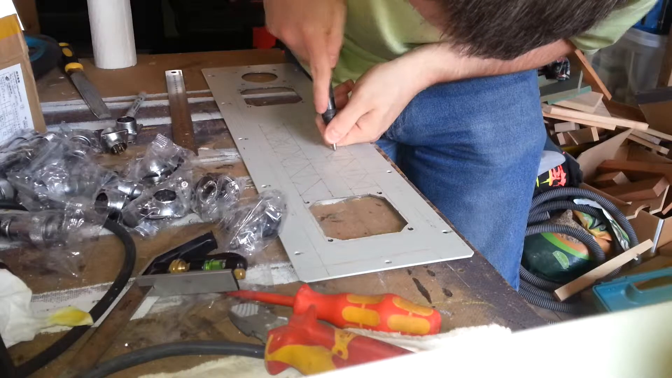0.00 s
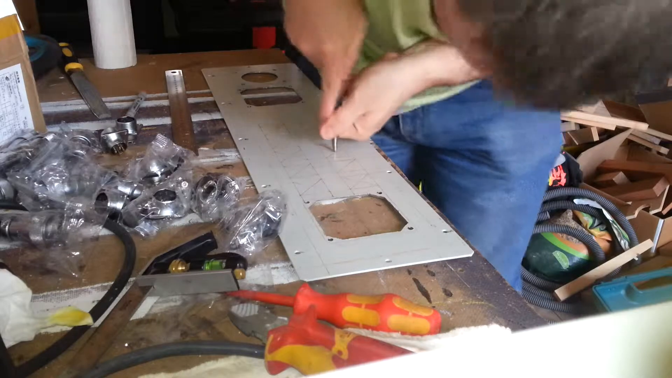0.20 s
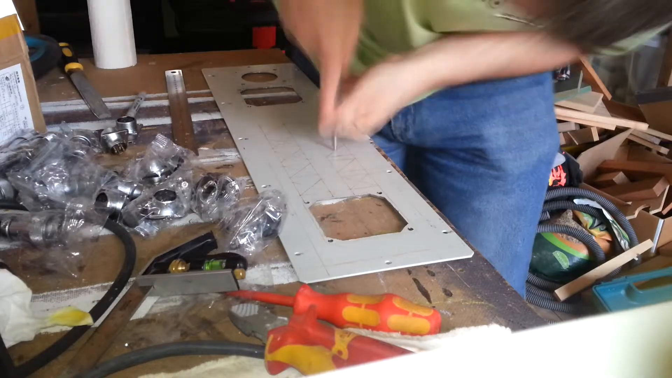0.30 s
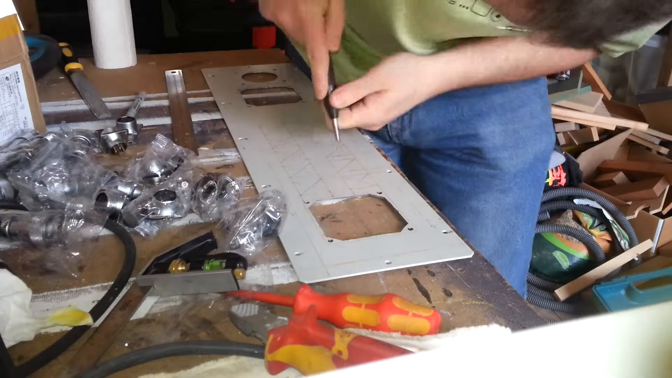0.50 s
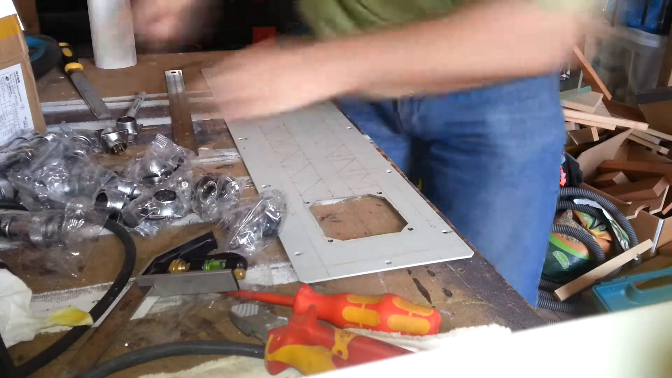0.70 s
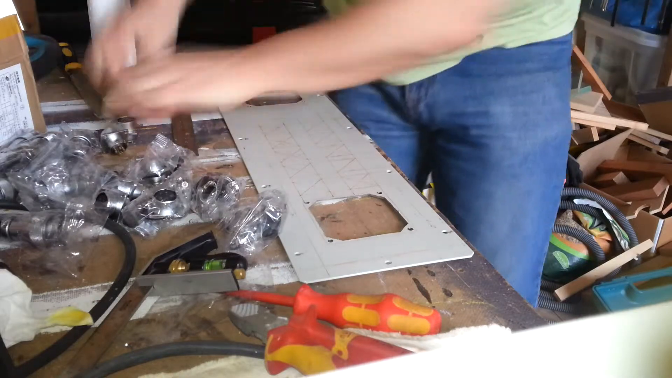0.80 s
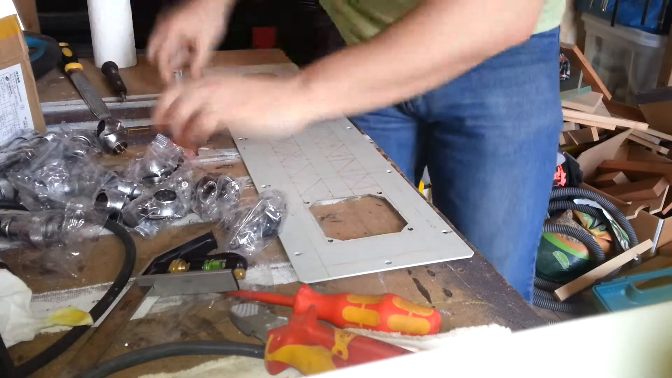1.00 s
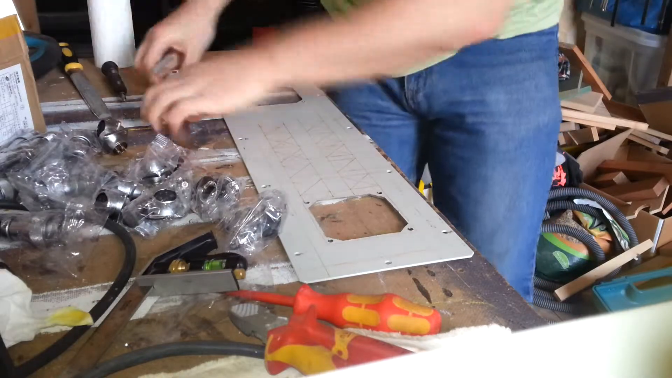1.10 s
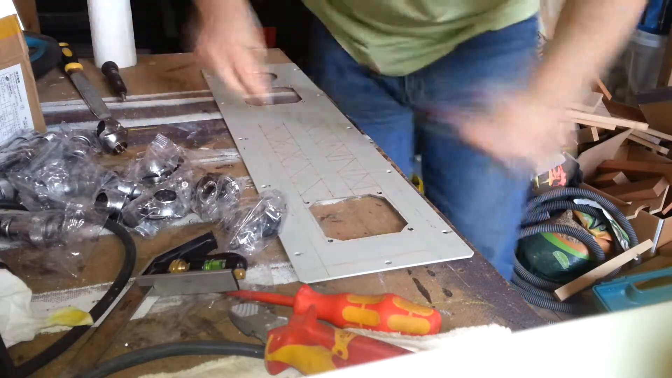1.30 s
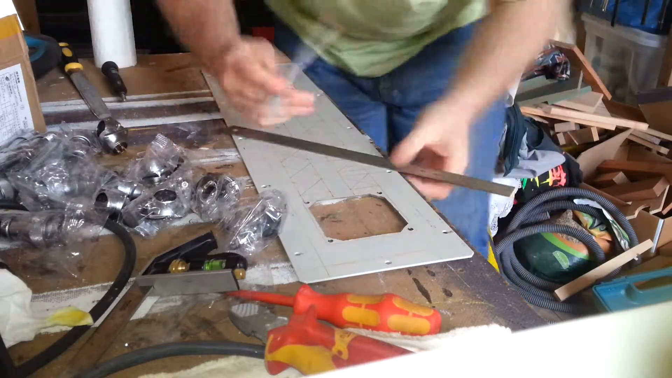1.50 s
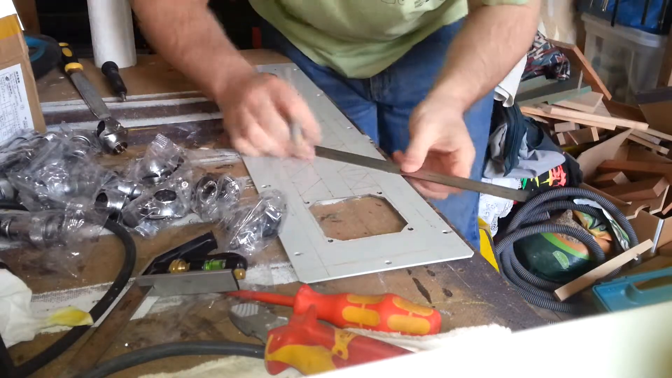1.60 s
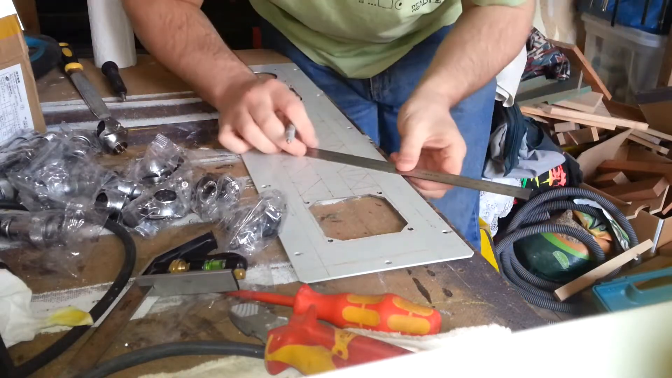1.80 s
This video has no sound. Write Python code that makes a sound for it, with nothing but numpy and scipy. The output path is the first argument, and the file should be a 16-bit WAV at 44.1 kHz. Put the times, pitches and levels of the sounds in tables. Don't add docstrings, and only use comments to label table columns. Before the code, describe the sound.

A centre punch presses on sheet metal with low ticks near 0.2 s, then fires at 0.25 s: a loud, sharp metallic crack, briefly ringing, with a weak bounce at 0.33. The punch clacks onto the bench at 0.78 and settles with a tiny tinkle. A steel rule scrapes free at 1.03, bumps at 1.2, slaps the panel at 1.4, then rubs faintly. Dry, close, quiet workshop.

```python
import sys
import numpy as np
from scipy import signal
from scipy.fft import rfft, irfft
from scipy.io import wavfile

SR = 44100
rng = np.random.default_rng(int(sys.argv[2]) if len(sys.argv) > 2 else 0)


def nominal_scale(level):
    x = np.asarray(level, float) / 20
    return 10 ** x


def dump(signal):
    limited = np.clip(np.atleast_2d(signal).T, -1, 1)
    pcm = np.round(limited * 32767).astype(np.int16)
    wavfile.write(sys.argv[1], SR, pcm)


N = 83790
TIME_S = np.arange(N) / SR
HZ = np.arange(N // 2 + 1) * SR / N + 1e-3



def curve(table, column=1):
    table = np.array(table, float)
    return np.interp(np.log(HZ), np.log(table[:, 0]), table[:, column])


def swell(rows, slower, crack_db, touch_s):
    crack_s = 0.00064
    power = 0
    for start_s, rise_s, db, step_db, t60_s in rows:
        age = TIME_S - start_s
        rising_db = step_db * (1 - age.clip(0) / rise_s)
        falling_db = -60 * (age - rise_s) / (t60_s * slower)
        shape_db = np.where(age < rise_s, rising_db, falling_db)
        touch_crack = (age >= 0) * np.exp(-abs(age) / crack_s)
        crest_crack = np.exp(-abs(age - rise_s) / crack_s)
        onset = np.exp(age.clip(None, 0) / touch_s)
        cracks = 1 + nominal_scale(2 * crack_db) * (touch_crack + crest_crack)
        power = power + onset * nominal_scale(2 * (db + shape_db)) * cracks
    return np.sqrt(power)


def struck(rows, tone, ring, ring_db, bass_slower, grit_db, crack_db, touch_s=.0001):
    narrowest_hz, split_hz = 80, 2100
    hits = rng.standard_normal((3, N)) * nominal_scale(grit_db * rng.exponential(size=N).clip(0, 4))
    hits /= hits.std()
    body = nominal_scale(curve(tone))
    for hz, width_hz, db in ring:
        body = body + nominal_scale(db + ring_db) / (1 + 2j * (HZ - hz) / max(width_hz, narrowest_hz))
    body = body / np.sqrt(np.mean(abs(body) ** 2))
    bass = rfft(hits * swell(rows, bass_slower, crack_db - 9.0, touch_s))
    treble = rfft(hits * swell(rows, 1, crack_db, touch_s))
    low = 1 / (1 + (HZ / split_hz) ** 2)
    return body * (low * bass + (1 - low) * treble)


SNAP = [
    (.2548, 0.017, -10.5, -3.5, 0.092),
]
SNAP_TONE = [(18, -52.5), (30, -29.5), (787, -6), (1440, -5), (3400, -5.5), (5450, -6), (12300, -11.5),
             (14300, -23.5), (15500, -49)]
SNAP_RING = [(370, 40, -14.5), (773, 50, -13.5), (1040, 50, -18), (2550, 20, -9), (3333, 41, -2),
             (3640, 200, -3), (3900, 38, -3.5), (4160, 183, -4), (4660, 86, -8.5), (7700, 35, -13.5),
             (10600, 400, -22.5), (11840, 79.3, -19)]


def snap():
    return struck(SNAP, SNAP_TONE, SNAP_RING, ring_db=7.0, bass_slower=1.9, grit_db=3.5,
                  crack_db=-0.5, touch_s=0.00086)


REBOUND = [
    (.330, 0.019, -29, -6.5, 0.062),
]


def rebound():
    return struck(REBOUND, SNAP_TONE, SNAP_RING, ring_db=3.5, bass_slower=1.74, grit_db=-0.5, crack_db=6.5)


PRESS = [
    (.187, 0.017, -26, -6, 0.23),
    (.219, 0.022, -23.5, 2, 0.22),
]
PRESS_TONE = [(24, -61), (40, -39), (136, 2.5), (621, -12), (1310, -12.5), (2270, -18), (6010, -20.5),
              (15500, -54)]
PRESS_RING = [(346, 80, -3.5), (1164, 520, -14.5), (3550, 330, -18.5)]


def press():
    return struck(PRESS, PRESS_TONE, PRESS_RING, ring_db=3.5, bass_slower=1.2, grit_db=5.0, crack_db=9)


SLAP = [
    (1.393, 0.022, -23, -5.5, 0.073),
]
SLAP_TONE = [(59, -53.5), (100, -16.5), (1210, -5.5), (2690, -3.5), (3540, -2), (12600, -9.5), (14500, -12),
             (15500, -40)]
SLAP_RING = [(1210, 93, -11), (3180, 138, -13), (3550, 64, 1.5), (4220, 77, -1), (5530, 120, -12),
             (6710, 150, -4), (12100, 130, -18)]


def slap():
    return struck(SLAP, SLAP_TONE, SLAP_RING, ring_db=3.5, bass_slower=2.04, grit_db=1.5, crack_db=5.5)


DROP = [
    (.751, 0.0273, -29.5, -26, 0.041),
    (.7815, 0.01, -21, -2, 0.091),
]
DROP_TONE = [(24, -50), (40, -12), (461, -2), (2270, -11), (2840, -17.5), (3930, -10), (11800, -30.5),
             (15500, -47)]
DROP_RING = [(478, 50, -22.5), (1240, 52, -14), (1820, 55, -18), (4010, 200, -5), (3760, 44, -10.5),
             (5300, 130, -16)]


def drop():
    return struck(DROP, DROP_TONE, DROP_RING, ring_db=-2.5, bass_slower=1.44, grit_db=2.5, crack_db=11.0)


LIFT = [
    (1.0215, 0.018, -28, -15.5, .12),
    (1.06, 0.014, -43.5, -21.5, 0.16),
]
LIFT_TONE = [(59, -63), (100, -35), (362, -5.5), (497, -9), (1620, 0.5), (7410, -21.5), (10600, -42),
             (15500, -46.5)]
LIFT_RING = [(1430, 390, -11), (2910, 82, -23), (3500, 430, -7.5), (10350, 690, -14), (13500, 200, -24)]


def lift():
    return struck(LIFT, LIFT_TONE, LIFT_RING, ring_db=-1.5, bass_slower=1.28, grit_db=2.0, crack_db=5)


THUD = [
    (.025, 0.016, -51, -14, 0.12),
    (.176, 0.0099, -45.5, -4, 0.05),
    (.885, 0.0023, -41, 2, 0.108),
    (1.176, 0.0265, -26, -9.5, 0.09),
    (1.360, 0.013, -36, -9, 0.21),
]
THUD_TONE = [(50, -57.5), (180, -17), (650, 0), (2000, -12), (4500, -21), (6000, -40.5), (15000, -42)]
THUD_RING = [(304.2, 50, -4.5), (479, 50, -17.5), (678, 94, -1)]


def thud():
    return struck(THUD, THUD_TONE, THUD_RING, ring_db=-7.5, bass_slower=0.93, grit_db=3.5,
                  crack_db=-8, touch_s=0.0024)


KNOCK = [
    (.692, 0.0064, -55.5, -2, 0.029),
    (.846, 0.014, -40, -5.5, 0.19),
    (1.108, 0.043, -42, 1.5, 0.6),
    (1.236, 0.027, -36.5, -5, 0.093),
    (1.302, 0.017, -39.5, -8, 0.11),
    (1.445, 0.024, -47.5, -0.5, 0.058),
]
KNOCK_TONE = [(80, -33.5), (450, 1), (1100, -7), (4500, -16.5), (6000, -27), (14500, -33)]
KNOCK_RING = [(557, 31, -9), (1060, 220, -2.5), (1480, 130, -4)]


def knock():
    return struck(KNOCK, KNOCK_TONE, KNOCK_RING, ring_db=-4.5, bass_slower=0.89, grit_db=7.0,
                  crack_db=-20, touch_s=0.0045)


TINKLE = [
    (.846, 0.0031, -39.5, -7, 0.13),
]
TINKLE_TONE = [(1000, 14.5), (4000, 5), (15000, -13.5)]
TINKLE_RING = [(9000, 172, 1), (14000, 730, -4)]


def tinkle():
    return struck(TINKLE, TINKLE_TONE, TINKLE_RING, ring_db=8.5, bass_slower=2.0, grit_db=3.0, crack_db=6.5)


SCUFF = [
    (.945, 0.011, -59.5, 1, 0.035),
    (1.585, 0.0303, -53, -2.5, 0.16),
    (1.66, 0.016, -59, -4, 0.023),
    (1.718, 0.011, -56, -0.5, 0.044),
    (1.788, 0.0117, -53.5, -2.5, 0.064),
    (1.845, 0.0069, -59, -6.5, 0.039),
]
SCUFF_TONE = [(1000, 9.5), (2200, 1.5), (3600, -6), (6000, -12)]
SCUFF_RING = [(3430, 91, 6.3), (3900, 120, 1.8)]


def scuff():
    return struck(SCUFF, SCUFF_TONE, SCUFF_RING, ring_db=3.5, bass_slower=4.5, grit_db=2.0,
                  crack_db=1, touch_s=0.0069)


# t/s, f/Hz, level/dB, T60/s
TAPS = [(.197, 350, -17.5, .08), (.2435, 3000, -26, .02), (.781, 4100, -20, 0.036),
        (.7815, 6800, -26, .008), (0.19, 1000, -29, 0.01), (.2205, 4200, -28, 0.0099),
        (.2205, 1310, -20, .06), (.231, 370, -19.5, 0.049), (.2655, 3800, -19, .02),
        (.2695, 3300, -12, 0.011), (0.2729, 680, -18, 0.03), (.277, 3400, -19, 0.025),
        (.2545, 4000, -16, 0.037), (.2365, 5200, -31, 0.0079), (.287, 3200, -17, 0.027),
        (.3465, 4044, -21.5, 0.007), (.784, 1210, -19.5, .012), (.784, 2270, -23, 0.0078),
        (.7785, 253, -29, 0.026), (.784, 480, -18.5, 0.025), (0.79, 453, -15.5, 0.021),
        (0.78, 1800, -25, 0.0034), (0.8, 610, -24, 0.024), (0.84, 1180, -36, .02), (.862, 1220, -39, .02),
        (0.87, 533, -36, .03), (.889, 434, -26.5, 0.021), (.9, 530, -32.5, 0.018), (.858, 830, -38, 0.015),
        (1.036, 1490, -20.5, 0.0079), (1.038, 4500, -28, 0.0066), (1.031, 3700, -37, 0.022),
        (1.042, 1300, -30.5, 0.024), (1.194, 1900, -26, 0.018), (1.202, 1670, -23, 0.014),
        (1.1875, 1120, -29, 0.013), (1.17, 1120, -29, 0.014), (1.183, 640, -21, 0.011),
        (1.196, 540, -20.5, 0.0074), (1.186, 990, -24, 0.0084), (1.3989, 3720, -24.5, 0.024),
        (1.2555, 1010, -32, 0.028), (1.404, 3440, -27, 0.068), (1.4099, 5400, -16, 0.0064),
        (1.4145, 3600, -26, 0.02), (1.037, 10500, -45, 0.078), (1.396, 1177, -33, 0.15),
        (1.414, 3880, -28, 0.064)]


def taps():
    out, bass_cut_hz = 0, 250
    for start_s, hz, db, t60_s in TAPS:
        age = (TIME_S - start_s).clip(0)
        out = out + nominal_scale(db - 60 * age / t60_s) * np.sin(2 * np.pi * hz * age)
    return rfft(out) / (1 - 1j * bass_cut_hz / HZ)


# t/s, held/s, f/Hz, level/dB, T60/s
SING = [
    (.030, .024, 310, -52, .3),
    (.2337, .001, 520, -13, .012),
    (.255, .008, 4220, -19, .08),
    (.277, .047, 915, -22, .24),
    (.36, .09, 4000, -68, .6),
    (.582, .02, 950, -46, .035),
    (.894, .008, 480, -41, .05),
    (1.2015, .002, 620, -19, .015),
    (1.398, .034, 3630, -31, .14),
    (1.458, .025, 900, -48, .2),
]


def singing():
    out, rise_s, damping_s = 0, .0005, .005
    for start_s, held_s, hz, db, t60_s in SING:
        age = TIME_S - start_s
        gate = np.clip(age / rise_s, 0, 1) * np.clip((held_s - age) / damping_s + 1, 0, 1)
        out = out + gate * nominal_scale(db - 60 * age.clip(0) / t60_s) * np.sin(2 * np.pi * hz * age)
    return rfft(out)


# t/s, held/s, start f/Hz, end f/Hz, level/dB
CLIMB = [
    (.248, .034, 710, 830, -22),
    (.266, .02, 570, 670, -27),
    (.254, .016, 1070, 1040, -34),
    (.345, .022, 350, 490, -38),
    (.340, .032, 1190, 1200, -40),
    (.252, .04, 48, 36, -33),
]


def bending():
    out = 0
    for start_s, held_s, hz, end_hz, db in CLIMB:
        age = (TIME_S - start_s).clip(0, held_s)
        cycles = age * (hz + (end_hz - hz) * age / held_s / 2)
        out = out + nominal_scale(db) * np.sin(np.pi * age / held_s) * np.sin(2 * np.pi * cycles)
    return rfft(out)


def room(near):
    level_db, t60_s = -35.5, 0.13
    tail = rng.standard_normal((3, N)) * nominal_scale(-60 * TIME_S / t60_s)
    return near[0] * rfft(tail / np.sqrt(np.sum(tail[0] ** 2))) * nominal_scale(level_db)


# f/Hz, density/dB per Hz
AIR = [(18, -40.5), (30, -23.5), (160, 1), (410, -7.5), (1510, -13.5), (1820, -20), (12600, -27),
       (14300, -23), (15500, -58.5)]


def air():
    level_db, late_db, late_s = -59.5, 0.5, 0.89
    out = 0
    noise = rfft(rng.standard_normal((3, N))) * nominal_scale(curve(AIR))
    for octave in range(5, 15):
        band = irfft(noise * np.clip(1 - abs(np.log2(HZ) - octave), 0, 1), N)
        flicker_db = np.interp(TIME_S, np.arange(40) / 20, rng.standard_normal(40))
        out = out + band * nominal_scale(flicker_db)
    return rfft(out / out.std() * nominal_scale(level_db + late_db * (TIME_S > late_s)))


# f/Hz, shared part/0-1
PORTS = [(60, .92), (330, .88), (640, .3), (1400, .05), (3100, .25), (8000, .03)]
# f/Hz, left re right/dB
LEFT_DB = [(250, -0.5), (600, 1), (3000, 0), (10000, 3.5)]


def ports(spectra):
    share = np.clip(curve(PORTS), 0, 1)
    both = np.sqrt(share) * spectra[0] + np.sqrt(1 - share) * spectra[1:]
    return irfft(both * nominal_scale(np.array([[.5], [-.5]]) * curve(LEFT_DB)), N)


def scene():
    contacts = (press() + snap() + drop() + tinkle() + lift()
               + thud() + knock() + slap() + scuff() + rebound())
    port_turn_rad = 0.88
    turn = np.exp(1j * port_turn_rad * np.array([[0], [1], [-1]]))
    near = contacts + (singing() + taps() + bending()) * turn
    return ports(near + room(near) + air())


def low_pass(x):
    return signal.sosfilt(signal.butter(12, 15950, fs=SR, output="sos"), x)


def record(dry):
    bass_cut_hz, top_hz, top_db = 76.5, 14750, -24.5
    rounded = .9 * np.tanh(dry / .9)
    top_cut = 1 - (1 - nominal_scale(top_db)) / (1 + np.exp(-((HZ - top_hz) / 40).clip(-50, 50)))
    thin_bass = 1 / (1 + (bass_cut_hz / HZ) ** 2)
    return low_pass(irfft(rfft(rounded) * top_cut * thin_bass, N))


dry = scene()
out = record(dry)
dump(out)
```